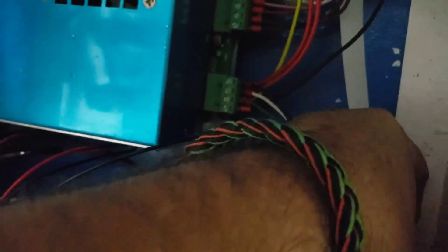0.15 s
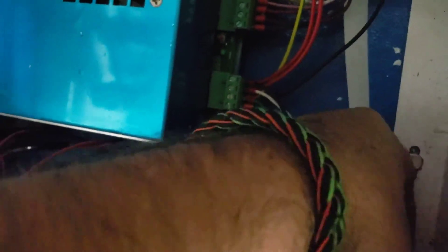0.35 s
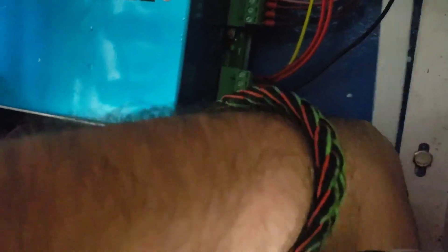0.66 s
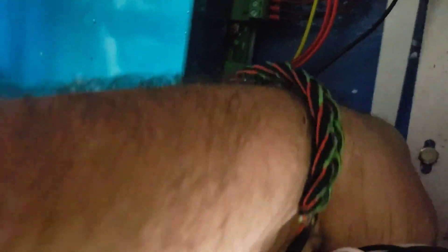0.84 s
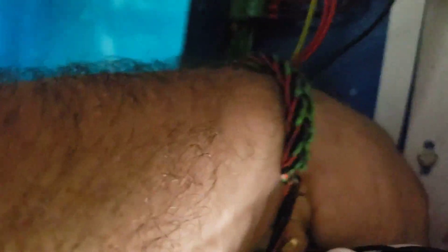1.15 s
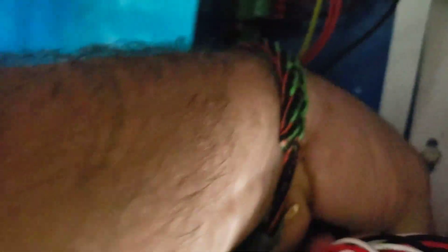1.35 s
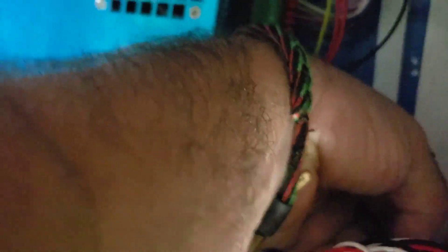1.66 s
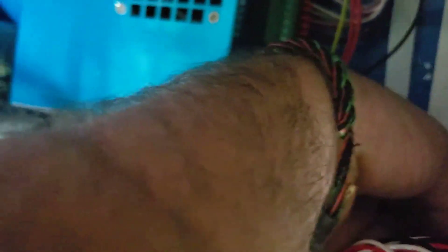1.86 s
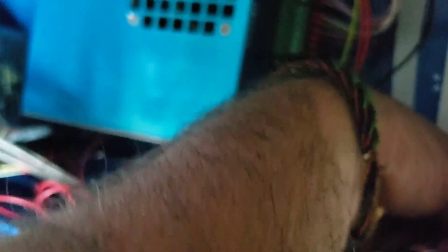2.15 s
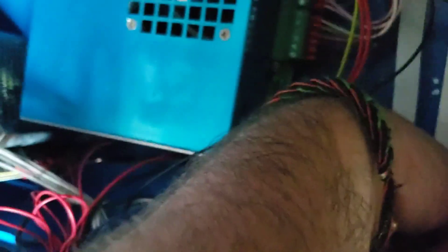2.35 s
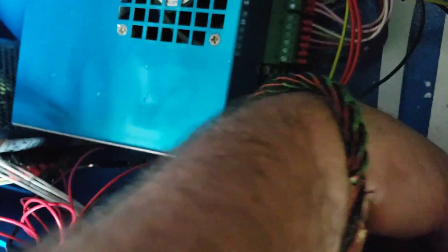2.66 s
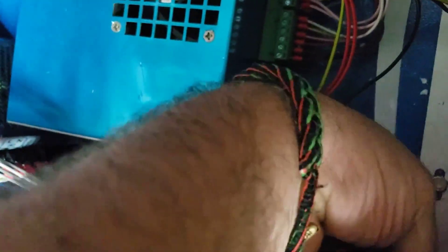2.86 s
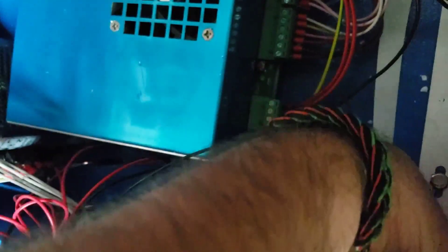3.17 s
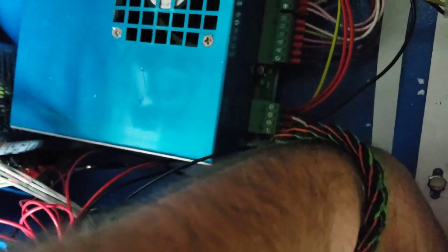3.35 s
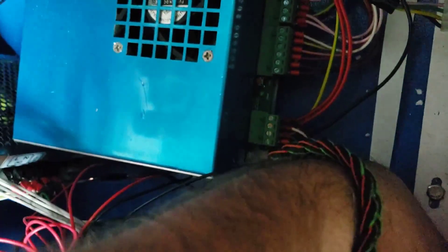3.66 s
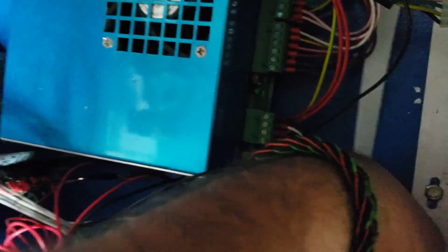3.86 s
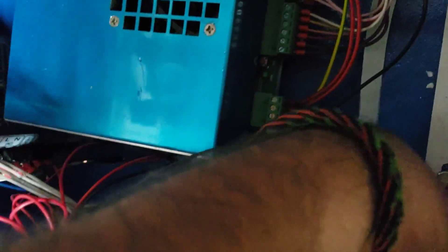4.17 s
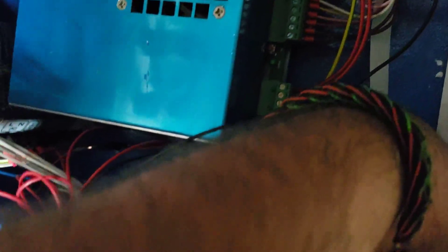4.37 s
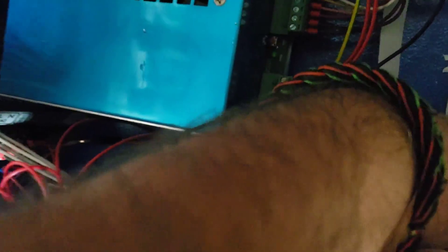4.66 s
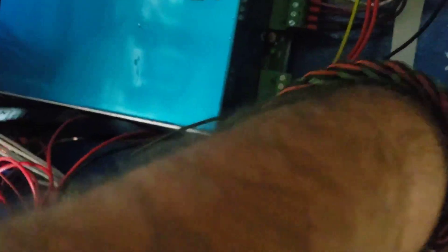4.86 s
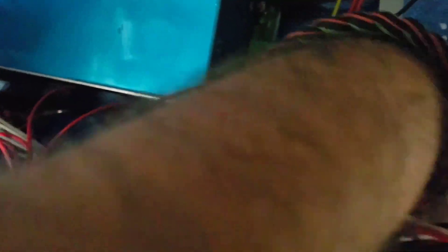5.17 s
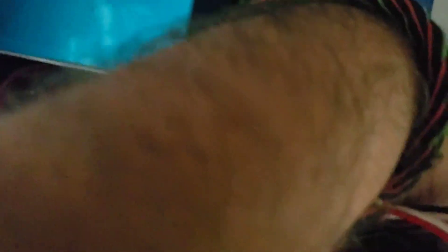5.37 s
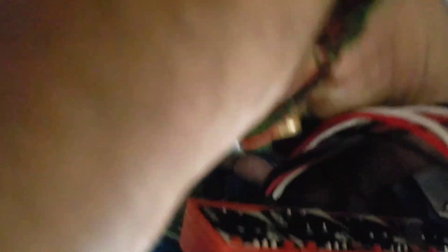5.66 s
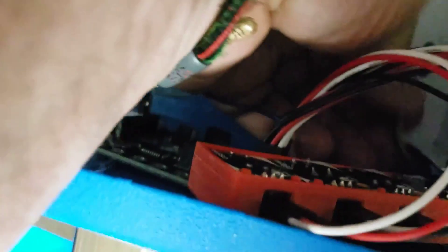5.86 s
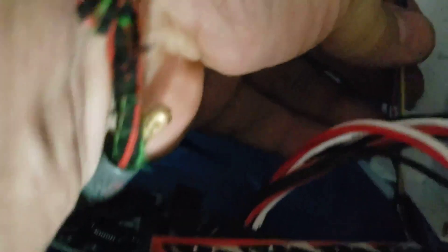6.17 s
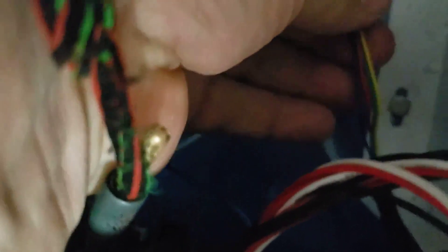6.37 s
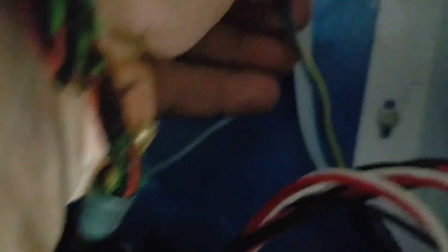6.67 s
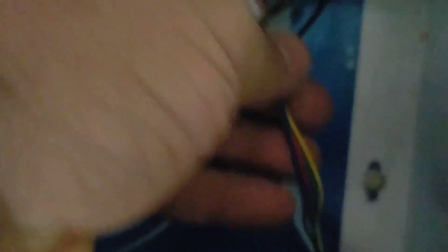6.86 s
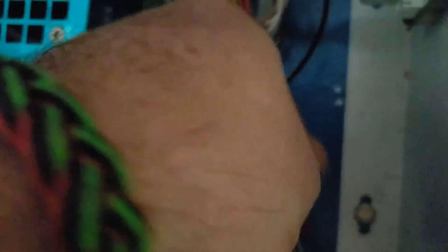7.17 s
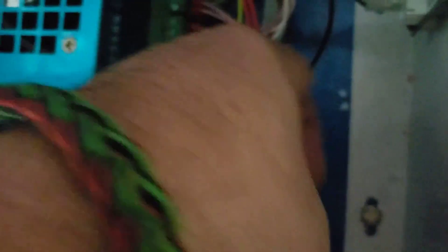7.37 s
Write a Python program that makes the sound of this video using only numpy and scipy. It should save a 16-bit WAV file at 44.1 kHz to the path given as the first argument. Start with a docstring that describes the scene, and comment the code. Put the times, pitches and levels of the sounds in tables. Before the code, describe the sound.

Very close to the microphone, a hand routes a cable through a sheet-metal case. Short gritty scrapes and soft rubs come in uneven pushes, with small dry ticks on plastic. A hard hollow double knock lands early, then quieter fumbling; past five seconds come stronger knocks, scraping and one sharp clack, before it thins out. Small room, faint low drone.

```python
"""Cable in a metal case

A hand routes a cable inside a sheet-metal machine case, close to the microphone.
In short pushes the cable drags over the panels: noise bursts for tiny slips, played through the case's echo.
It also knocks and chatters against the panels, and its wires tick on plastic parts with one resonance each.
Every contact rings the same case. Behind it lies a small room: noise for air, sines for a low drone and mains hum.
"""
import sys
import numpy as np
from scipy import signal
from scipy.fft import rfft, irfft, next_fast_len
from scipy.io import wavfile
from scipy.ndimage import uniform_filter1d, map_coordinates

SR = 44100
rng = np.random.default_rng(int(sys.argv[2]) if len(sys.argv) > 2 else 0)


def output_pcm(signal):
    """Save a mono or channel-first signal as 16-bit PCM at the path in sys.argv[1].

    Samples are clipped to [-1, 1] before scaling.
    """
    pcm = np.clip(np.atleast_2d(signal).T, -1, 1) * 32767
    wavfile.write(sys.argv[1], SR, np.round(pcm).astype(np.int16))


N = 331632  # length of the scene in samples
LEFT_RIGHT = np.array([[.5], [-.5]])  # splits a left-minus-right difference over the two sides


# tone colour of sliding contact: f/Hz, level/dB (relative)
SLIDE_COLOUR = [(70, -8.5), (140, -2), (300, -0.5), (420, -4), (800, 0), (1500, -1.5), (2600, -2.5),
                (3800, -9), (6300, -15.5), (8800, -24.5), (12500, -20), (16000, -21)]


def dragging(rub_db=-1, scrape_db=-1, hiss_db=-1, spiky_db=6, catch_db=2, focus=3.8, room_db=-7, spots_count=6):
    """Insulation sticks and slips on the panels: dense tiny slips, in clumps, ring the case."""
    # each draw of grit holds for 16 samples; a slower wobble gathers it into clumps
    grit = amp(spiky_db * np.repeat(rng.standard_normal(N // 16 + 1), 16)[:N])
    grit *= amp(catch_db * wobble(70))
    slips = grit * rng.standard_normal(N)

    # the touching point wanders from spot to spot, each with its own echo
    nearness = amp(12 * np.array([wobble(6) for _ in range(spots_count)]))
    sound = np.zeros((2, N))
    for share in nearness / np.linalg.norm(nearness, axis=0):
        answer = case_answer(walls_t60=0.02, modes_db=2.0)
        room = fading(ROOM_DECAY, 1, answer.shape[1])
        answer = coloured(answer + amp(room_db) * room, SLIDE_COLOUR)
        sound += signal.oaconvolve(answer, (share * slips)[None], axes=1)[:, :N]
    rub, scrape, _ = map(unit, registers(sound))

    # the hiss comes from all along the cable, so its slips blur together
    blurred = np.sqrt(np.abs(uniform_filter1d(grit ** 2, size=420)))
    hiss = unit(registers(coloured(diffuse(N) * blurred, SLIDE_COLOUR))[2])

    rub_effort_db, scrape_effort_db, pitch, hiss_effort_db = effort()
    # slow slips stir the hollow of the case, fast ones its thin panels
    hollow = signal.sosfilt(signal.butter(2, 1200, "low", fs=SR, output="sos"), scrape)
    thin = signal.sosfilt(signal.butter(2, 1900, "high", fs=SR, output="sos"), scrape)
    angle = np.arctan((pitch / 1300) ** focus)
    scrape = unit(np.cos(angle) * unit(hollow) - np.sin(angle) * unit(thin))

    moving = amp(rub_effort_db + rub_db) * rub
    moving += amp(scrape_effort_db + scrape_db) * scrape
    return moving + amp(hiss_effort_db + hiss_db) * hiss


# each push of the hand drags the cable over the panels:
# start t/s, length t/s, scrape level/dB, scrape pitch f/Hz (blends hollow and thin),
# rub level/dB over the scrape, hiss level/dB over the scrape; levels before the trims in dragging()
PUSHES = [ (-.015, 0.13, -54.5, 1110, 1.5, -10.5), (0.257, 0.12, -60.5, 1250, -22, -22),
          (0.391, 0.062, -49.5, 1063, 4, -13.5), (0.511, 0.27, -55.5, 1125, -2, -11.5),
          (0.752, 0.14, -48.5, 1200, 0.5, -7.5), (0.87, 0.14, -58, 1050, -3, -8.5),
          (1.207, 0.036, -64, 1000, 9.5, -2.5), (1.421, 0.21, -63.5, 1146, 5.5, 2.5),
          (1.531, 0.19, -52.5, 1257, 5.5, -2.5), (1.639, 0.013, -37.5, 1150, -3, -11),
          (1.698, 0.036, -61, 947, 12.5, -17), (2.039, .1, -60, 1063, -15, -15),
          (2.329, 0.14, -54, 1395, -1.5, -2), (2.44, 0.051, -50, 1200, 1, -12),
          (2.535, .14, -56.5, 1032, -4, -12), (2.699, 0.024, -62.5, 2084, 2, -2),
          (2.885, 0.067, -67.5, 803, 13.5, -2), (2.937, 0.037, -50.5, 830, -4, -14.5),
          (3.03, 0.14, -60.5, 1098, 2.5, -4.5), (3.225, 0.089, -61, 900, 1.5, -21),
          (3.35, 0.043, -60, 880, 8.5, -39), (3.757, .05, -69, 1500, 10.5, -11),
          (3.871, 0.11, -52.5, 1264, -3, -5.5), (4.059, 0.082, -61.5, 771, 8, -10.5),
          (4.22, 0.066, -54.5, 906, 5, -11.5), (4.326, 0.073, -54.5, 1007, 4, -12.5),
          (4.419, 0.19, -57.5, 766, 5, -18), (4.555, 0.082, -46, 1300, -6, -6.5),
          (4.723, 0.089, -52.5, 1100, -14, -6.5), (4.9, 0.083, -55.5, 1000, -6, -7.5),
          (5.152, 0.054, -52, 900, 10, 0), (5.3, 0.15, -45, 950, -9, -12),
          (5.378, 0.063, -38.5, 1050, -5, -14), (5.445, 0.11, -40, 1037, 3, -13.5),
          (5.586, 0.18, -46.5, 1100, -7.5, -8), (5.77, 0.1, -54, 1050, 6.5, -13),
          (5.969, .05, -57.5, 1622, -14, -11), (6.02, 0.031, -51.5, 1600, 1.5, -16),
          (6.372, 0.11, -55, 1202, 0, -10.5), (6.521, 0.13, -63.5, 950, 2, -9.5),
          (6.801, 0.043, -63, 950, -1, -21.5), (6.897, 0.027, -66.5, 1000, 5, -9),
          (7.257, 0.0255, -61.5, 842, -1, -8.5), (7.317, 0.16, -77, 807, 17.5, -5),
          (7.464, 0.048, -65, 875, 3.5, -2)]
# how fast each part dies once the hand stops: rub, scrape, hiss [dB per s]
RELEASE_RATES = [111, 160, 165.5]
# between pushes the held cable creeps faintly on the panels: t/s, scrape level/dB before its waver
CREEP_LEVELS = [(0, -62.5), (.55, -71), (.95, -65.5), (1.35, -77), (1.85, -69.5), (2.25, -76), (2.6, -64.5),
                (2.85, -77.5), (3.1, -71), (3.33, -75.5), (3.5, -64), (3.72, -82.5), (4.4, -67), (5.6, -56),
                (5.9, -70), (6.22, -79), (6.55, -74.5), (6.77, -84), (7.15, -87.5), (7.52, -77)]
CREEP_HZ, CREEP_RUB_DB, CREEP_HISS_DB, CREEP_WAVER_DB = 880, 6, -10.5, 2
ATTACK_S, SAG_DB_PER_S = 0.035, 22.5  # every push gathers speed, then slowly loses it
SLACK_DB, SLACK_DB_PER_S = -13.5, 258.5  # slack is taken up first: level at the start, growth until then


def effort():
    """Rub dB, scrape dB, scrape pitch and hiss dB of the moving cable: the pushes on top of its creeping."""
    t = np.arange(N) / SR
    creep_s, creep_level = np.transpose(CREEP_LEVELS)
    creep_db = np.interp(t, creep_s, creep_level) + CREEP_WAVER_DB * wobble(25)
    # three rows: rub, scrape, hiss
    power = amp(creep_db + np.array([[CREEP_RUB_DB], [0], [CREEP_HISS_DB]])) ** 2
    pitch = CREEP_HZ * power[1]  # weighted by power, so the stronger motion sets the pitch

    for s, length, db, hz, rub_db, hiss_db in PUSHES:
        span = (t > s - 1) & (t < s + length + 1)
        age = t[span] - s
        grip = np.sin(np.pi / 2 * np.clip(age / ATTACK_S, 0, 1)) ** 2
        slack = amp(SLACK_DB + SLACK_DB_PER_S * np.minimum(age, 0))
        rise = np.maximum(grip, slack)
        sag_db = SAG_DB_PER_S * np.minimum(age, length)
        fall_db = sag_db + np.outer(RELEASE_RATES, np.maximum(age - length, 0))
        levels_db = db + np.array([[rub_db], [0], [hiss_db]])
        push = (rise * amp(levels_db - fall_db)) ** 2
        power[:, span] += push
        pitch[span] += hz * push[1]
    rub, scrape, hiss = 10 * np.log10(power)
    return rub, scrape, pitch / power[1], hiss


# the cable hits a panel: t/s, ring level/dB, thud level/dB over the ring, edge level/dB over the ring,
# chatter length t/s, left minus right level/dB; all before the final left-right tilt
PANEL_HITS = [(.055, -56.5, -19, 1.5, 0.027, -1), (.423, -63, -1.5, -8.5, 0.018, 11.5),
              (0.645, -26.5, -13, -7, 0.015, 0.5), (0.66, -26, -12.5, -36.5, 0.027, 2),
              (1.251, -59, 8.5, -5.5, 0.064, 2), (1.56, -49.5, 2, -7, 0.029, 1),
              (1.668, -37.5, -20, -7.5, 0.014, -1), (2.378, -50, 1.5, -1, .012, -1.5),
              (2.446, -44, -23, -7, 0.031, 2), (2.972, -65, -10, -7, 0.007, 5),
              (3.184, -51, 7, -33, 0.023, 1), (4.501, -58.5, 8.5, -28, 0.011, 0),
              (4.614, -46, -2, 0, 0.01, -1), (5.112, -27, -6.5, -6.5, 0.0073, 0.5),
              (5.126, -28.5, 0, -11, .024, 0.5), (5.472, -37, -7, -12.5, 0.022, 1.5),
              (5.724, -41, -1.5, -17.5, .07, 1), (5.79, -51, 9, -34, 0.06, 0),
              (6.035, -43, -34, -7, 0.061, -1.5), (6.285, -50.5, 2.5, 0.5, 0.021, 6.5),
              (6.319, -44.5, 1.5, -2, 0.019, -1.5), (6.914, -61.5, -2, -5.5, 0.005, 4.5),
              (7.281, -56, -19.5, -9.5, .012, 3.5)]
# tone colour of a blow: f/Hz, level/dB (relative)
BLOW_COLOUR = [(60, -18.5), (130, -19), (300, 0), (390, -7), (520, -0.5), (680, -2.5), (900, -1),
               (2300, -4.5), (3500, -16.5), (6000, -21), (8800, -30.5), (12000, -24), (16000, -29)]


def knocks(push_share=.45):
    """The first push flexes the panel into a thud; the chatter after it rings and adds a brief bright edge."""
    out = np.zeros((2, N))
    for s, db, thud_db, edge_db, length, pan_db in PANEL_HITS:
        answer = case_answer(walls_t60=0.075, modes_db=2.5)
        push = chatter(answer, push_share * length, spiky_db=-0.5, first=0.74, room_db=-5.5)
        rebounds = chatter(answer, length, spiky_db=6.5, first=0.5, room_db=-1)
        thud = crest(registers(coloured(push, BLOW_COLOUR))[0])
        _, ring, edge = map(crest, registers(coloured(rebounds, BLOW_COLOUR)))
        knock = amp(thud_db) * thud + ring + amp(edge_db) * edge
        add(out, s, amp(db + pan_db * LEFT_RIGHT) * knock)
    return out


# a wire or finger taps or rubs a part that rings in one resonance:
# t/s, level/dB at its loudest before the final left-right tilt, f/Hz, Q (sharpness), chatter length t/s
PART_TAPS = [(.06, -46, 1460, 3.3, 0.0094), (.265, -57, 2930, 4, 0.053), (.355, -63.5, 3740, 3.6, 0.006),
             (0.64, -39, 4000, 0.79, 0.004), (0.717, -38, 5700, 8.2, 0.00054),
             (.785, -50.5, 2900, 5.7, 0.069), (1.403, -62, 13300, 3.3, 0.0036),
             (1.486, -51, 13300, 6.3, .005), (2.048, -55, 760, 12, 0.022), (2.341, -60, 4500, 1.4, 0.028),
             (2.565, -50, 3700, 1.7, 0.004), (2.635, -51, 670, 3.8, 0.019),
             (2.645, -40.5, 45.5, 3.4, 0.062), (2.741, -55, 2630, 1.3, 0.038), (2.876, -67, 2800, 33, 0.16),
             (3.118, -48.5, 13100, 0.84, 0.006), (3.184, -59.5, 3760, 4.3, 0.0013),
             (3.184, -45.5, 740, 9.5, 0.0094), (3.255, -53.5, 3230, 3.5, 0.005),
             (3.355, -69, 2870, 7.1, 0.043), (3.38, -53, 923, 17, 0.028), (3.44, -44, 4020, 2, 0.0043),
             (3.561, -43, 3100, 1.55, 0.004), (3.566, -53.5, 1240, 1.7, 0.02),
             (3.773, -64.5, 1940, 4.6, 0.022), (3.901, -44.5, 864, 5.8, 0.003),
             (4.018, -50.5, 13500, 2.6, 0.0016), (4.041, -59, 13000, 2, .002),
             (4.064, -55, 13000, 3.1, .002), (4.082, -59.5, 6000, 13, 0.019),
             (4.207, -64, 12200, 2.8, 0.0027), (4.249, -55, 12300, 2.4, 0.0036),
             (4.353, -57, 6150, 39, 0.015), (4.58, -52.5, 6050, 1, 0.021),
             (4.905, -52.5, 2640, 2.2, 0.0074), (5.035, -38, 2690, 1.7, 0.035),
             (5.072, -42.5, 9940, 0.64, 0.0023), (5.082, -40, 5970, 0.2, 0.0088),
             (5.422, -41, 2500, 3.2, 0.0088), (5.455, -46, 11930, 0.23, 0.027),
             (5.529, -51, 6000, 6.1, 0.015), (5.55, -38.5, 3040, 2.2, 0.0032),
             (5.676, -39, 3800, 2.2, 0.011), (5.697, -22, 2450, 1.85, 0.008),
             (5.7, -32.5, 6000, 1.4, 0.0043), (5.844, -47.5, 3040, 0.55, 0.0067),
             (6.017, -52, 4480, 1, 0.016), (6.036, -45.5, 3570, 2, 0.013), (6.073, -46.5, 2760, 3.1, 0.016),
             (6.286, -44, 2280, 2.1, 0.031), (6.464, -53.5, 12800, 1.2, 0.0033),
             (6.55, -62, 985, 8.4, 0.057), (6.632, -63, 3500, 4.2, 0.015), (6.825, -59, 860, 4.2, 0.046),
             (6.916, -66, 2200, 2.9, 0.0055), (7.245, -68, 12500, 2.3, 0.072)]


def ticks(spots_count=12):
    """Each tap rings one resonance and is heard from one of several spots in the case."""
    out = np.zeros((2, N))
    spots = [case_answer(walls_t60=0.048, modes_db=3) for _ in range(spots_count)]
    for k, (s, db, hz, q, length) in enumerate(PART_TAPS):
        click = chatter(spots[k % spots_count], length, spiky_db=5.0, first=0.38, room_db=-4.0)
        resonance = lambda f: 1j * f * hz / (q * (hz * hz - f * f) + 1j * f * hz)
        add(out, s, amp(db) * crest(filtered(click, resonance)))
    return out


# how long the small room rings, before a small scale factor: f/Hz, t60 t/s (time to fall 60 dB)
ROOM_DECAY = [(150, 0.34), (400, 0.7), (1000, 0.39), (2800, 0.25), (7000, 0.15), (15000, 0.073)]


def chatter(answer, length, spiky_db, first, room_db):
    """A first touch and a short run of tiny rebounds sound the case; the room fills while they last."""
    count, total = max(int(length * SR), 8), answer.shape[1]
    force, size = rng.standard_normal((2, SR // 4))[:, :count]
    force = force * amp(spiky_db * size) * np.sqrt(1 - np.arange(count) / count)
    force[0] += first * np.linalg.norm(force)
    force = force / np.linalg.norm(force)
    near = signal.fftconvolve(answer, force[None], axes=1)[:, :total]
    room = fading(ROOM_DECAY, 0.91, total) * (1 - np.exp(-np.arange(total) / count))
    return near + amp(room_db) * room


# wall reflections inside the case: f/Hz, relative life (times walls_t60)
WALL_LIFE = [(200, 4.1), (900, 2.85), (3000, 1.51), (14000, 0.53)]
# ringing modes of the case: f/Hz, level/dB over its dense ringing (before modes_db and spread), t60 t/s
CASE_MODES = [(226.6, 14, 0.25), (267, 9.5, 1), (297.6, 13, 0.38), (376, -4.5, 0.87), (539.4, 14, 0.81),
              (664, -1.5, 0.84), (719, 9, 0.32), (758.7, 13, 0.11), (782, 12.5, 0.095), (841, 11, 0.35),
              (940, 0, 0.24), (1126, 7.5, 0.6), (1153, 11.5, 0.2), (1312, 4, 0.09), (1436, 8.5, 0.11),
              (1565, 7, 0.084), (1740, -15.5, 0.51), (1730, -18, 0.26), (2092, 13, 0.14),
              (2284, 5.5, 0.065), (2473, 11, 0.16), (2462, 6.5, 0.14), (2705, 9, 0.067), (2830, 8, 0.11)]


def case_answer(walls_t60, modes_db, spread_db=1):
    """One contact's echo: quick reflections between the walls, and the panel modes."""
    t = np.arange(SR // 3) / SR
    answer = np.zeros((2, len(t)))
    add(answer, 0, fading(WALL_LIFE, walls_t60, count=6000))
    chances = rng.standard_normal((len(CASE_MODES), 3))
    for (hz, db, t60), (strength, phase, skew) in zip(CASE_MODES, chances):
        damping = np.log(1000) / t60
        # short waves reach the two microphone ports out of step
        apart = np.arccos(np.clip(along(LIKENESS, hz), -1, 1))
        ports = np.sign(skew) * apart * LEFT_RIGHT
        ring = np.exp(-damping * t) * np.sin(2 * np.pi * (hz * t + phase) + ports)
        answer += amp(db + modes_db + spread_db * strength) * 2 * damping / SR * ring
    return answer


# colour of the room air: f/Hz, level/dB (relative)
AIR_COLOUR = [(13, -28), (22, 11.5), (76, 7), (302, -10.5), (409, -30), (602, -38), (771, -28), (1020, -39),
              (1860, -31), (2520, -34), (3230, -43.5), (6440, -43), (9220, -45.5), (14700, -34),
              (16000, -43)]
# a low drone in the room comes and goes: start t/s, length t/s, f/Hz, level/dB before its waver
ROOM_DRONES = [(0, 2.63, 85.95, -54), (2.69, 0.59, 76.7, -58), (3.945, 0.54, 58.1, -51.5),
               (5.5, 1.78, 61.5, -51)]
DRONE_FADE_S = 0.15


def background(air_db=-53.5, mains_hz=120, mains_db=-61):
    """Room air is shaped noise; the low wavering drone and mains hum are sines of unsteady level and phase."""
    t = np.arange(N) / SR
    air = amp(air_db) * unit(filtered(diffuse(N), lambda hz: amp(along(AIR_COLOUR, hz))))
    drone = np.zeros(N)
    for s, length, hz, db in ROOM_DRONES:
        # half open at the start and end times
        swell = np.clip(np.minimum(t - s, s + length - t) / DRONE_FADE_S + .5, 0, 1)
        tone = np.sin(2 * np.pi * hz * t + 0.23 * wobble(8.4))
        drone += swell * amp(db + 2.5 * wobble(10.0)) * tone
    hum = amp(mains_db + 3.3 * wobble(11.0)) * np.sin(2 * np.pi * mains_hz * t + .3 * wobble(1.3))
    return air + drone + hum


# how alike left and right are: f/Hz, likeness (1 the same, 0 unrelated, below 0 opposed)
LIKENESS = [(100, 0.92), (300, 0.84), (600, 0.81), (830, .6), (1200, 0.43), (1700, -0.46), (2500, .25),
            (5000, 0.019), (15000, -0.055)]


def diffuse(count):
    """Stereo white noise, alike in the bass and unrelated in the treble."""
    turn = lambda hz: np.arccos(np.clip(along(LIKENESS, hz), -1, 1)) / 2
    shares = lambda hz: np.array([np.cos(turn(hz)), np.sin(turn(hz))])
    mid, side = filtered(rng.standard_normal((2, count)), shares)
    return np.array([mid + side, mid - side])


def fading(t60_points, scale, count):
    """A stereo tail of energy 1 in its middle, in which each frequency dies at its own speed."""
    hz, age, z = signal.stft(diffuse(count), SR, nperseg=128)
    t60 = scale * along(t60_points, hz)[:, None]
    tail = signal.istft(z * amp(-60 * age / t60), SR, nperseg=128)[1][:, :count]
    return tail / np.linalg.norm(tail.mean(0))


def amp(db):
    """Decibels to gain."""
    return 10 ** (np.asarray(db) / 20)


def unit(x):
    """Scale a stereo pair so that its middle has rms (average strength) 1."""
    return x / np.sqrt(np.mean(x.mean(0) ** 2) + 1e-20)


def crest(x):
    """Scale a stereo pair so that the loudest moment of its middle has rms 1."""
    return x / np.sqrt(uniform_filter1d(x.mean(0) ** 2, size=400).max() + 1e-20)


def along(points, hz):
    """Read a curve of (Hz, value) points on a log axis."""
    f, v = np.transpose(points)
    return np.interp(np.log(hz + 1), np.log(f + 1), v)


def wobble(rate):
    """A smooth random curve with rate knots a second."""
    knots = rng.standard_normal(int(N * rate / SR) + 4)
    return map_coordinates(knots, [np.arange(N) * rate / SR])


def filtered(x, response):
    """Multiply the spectrum of x by a response of frequency."""
    n = x.shape[-1]
    m = next_fast_len(n + 4096, True)  # spare room at the end
    return irfft(rfft(x, m) * response(np.fft.rfftfreq(m, 1 / SR)), m)[..., :n]


def coloured(x, points, size=2048):
    """Give x a tone colour with a filter that never sounds ahead of its input."""
    cepstrum = irfft(np.log(amp(along(points, np.fft.rfftfreq(size, 1 / SR)))))
    # folding the cepstrum forward in time gives the minimum-phase filter
    cepstrum[1:size // 2] *= 2
    cepstrum[size // 2 + 1:] = 0
    kernel = irfft(np.exp(rfft(cepstrum)))
    return signal.fftconvolve(x, kernel[None], axes=1)[:, :x.shape[1]]


def registers(x, low_hz=420, middle_hz=640, high_hz=4000):
    """The low, middle and high parts of a sound."""
    bands = [(low_hz, "low"), ([middle_hz, high_hz], "band"), (high_hz, "high")]
    return [signal.sosfilt(signal.butter(4, hz, kind, fs=SR, output="sos"), x) for hz, kind in bands]


def add(track, s, sound):
    """Mix a sound in at time s."""
    part = track[:, round(s * SR):][:, :sound.shape[1]]
    part += sound[:, :part.shape[1]]


# left-right tilt of the whole scene: f/Hz, left minus right level/dB
SIDE_TILT = [(40, 1.5), (150, 4.5), (450, 4), (800, 5.5), (1400, 1), (2600, -2.5), (5000, 1.5), (8000, 6.5),
             (14000, 3)]


def scene():
    """All sounds; the left port faces the open case."""
    sound = dragging() + knocks() + ticks() + background()
    return filtered(sound, lambda hz: amp(along(SIDE_TILT, hz) * LEFT_RIGHT))


def record(dry, bass_hz=36, top_hz=16100):
    """The recorder sheds the deepest bass and cuts steeply above its band limit."""
    thinned = filtered(dry, lambda hz: hz ** 7 / (hz ** 7 + bass_hz ** 7))
    return filtered(thinned, lambda hz: 1 / (1 + (hz / top_hz) ** 160))


dry = scene()
out = record(dry)
output_pcm(out)
```